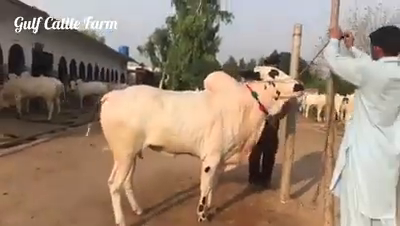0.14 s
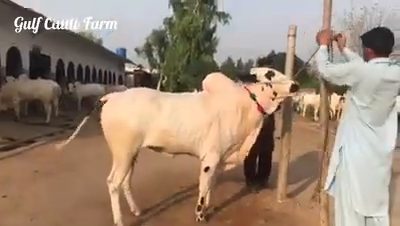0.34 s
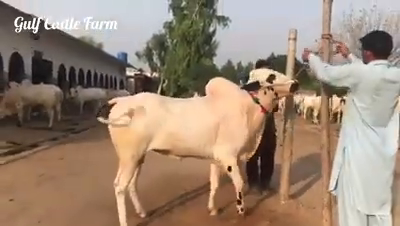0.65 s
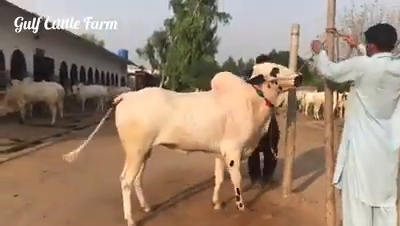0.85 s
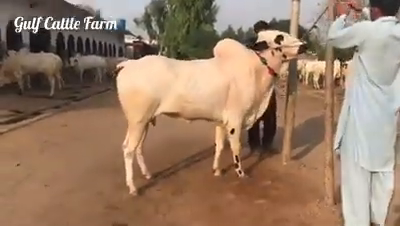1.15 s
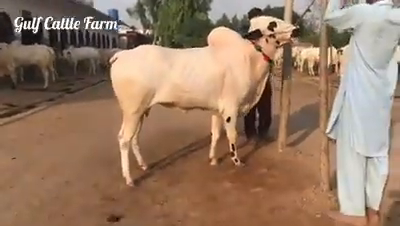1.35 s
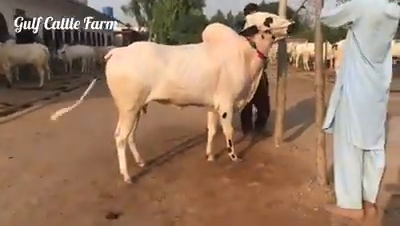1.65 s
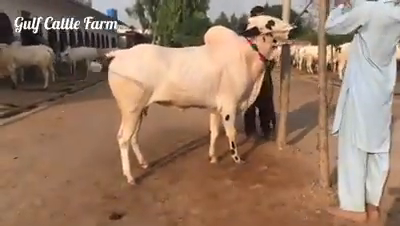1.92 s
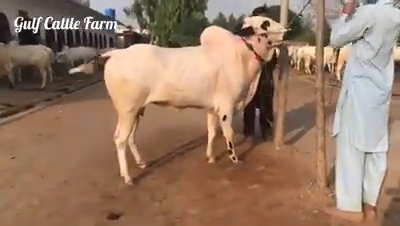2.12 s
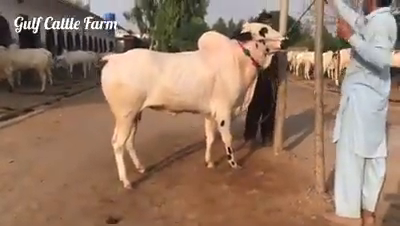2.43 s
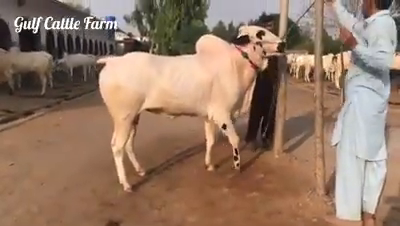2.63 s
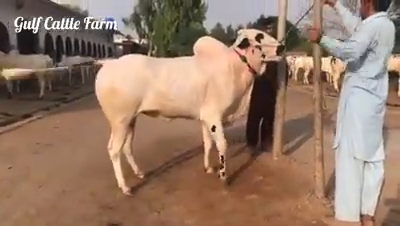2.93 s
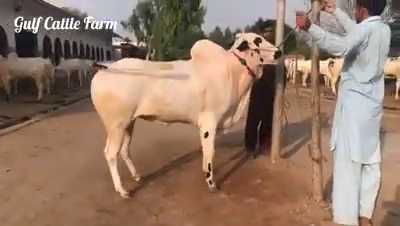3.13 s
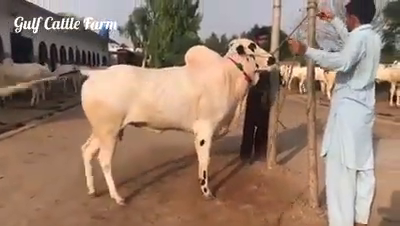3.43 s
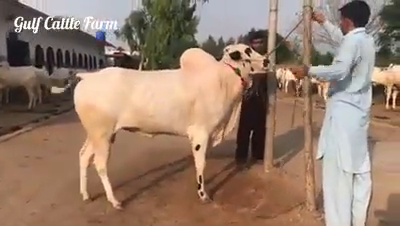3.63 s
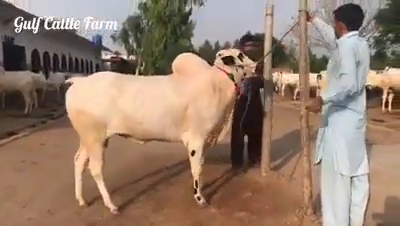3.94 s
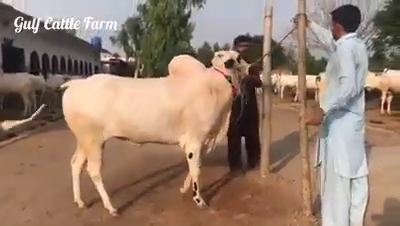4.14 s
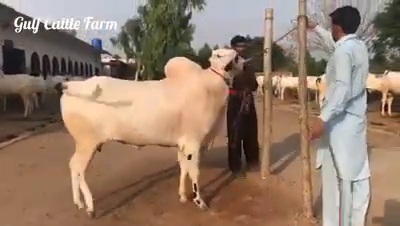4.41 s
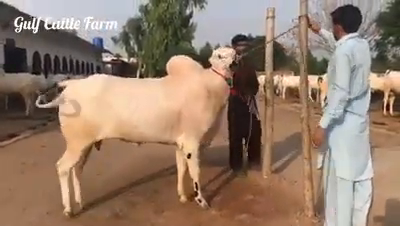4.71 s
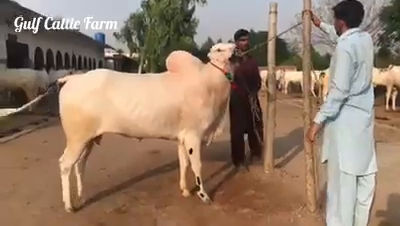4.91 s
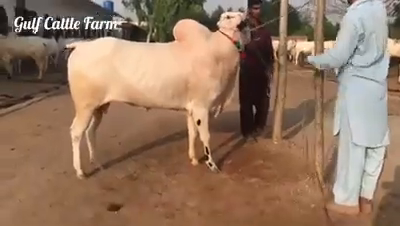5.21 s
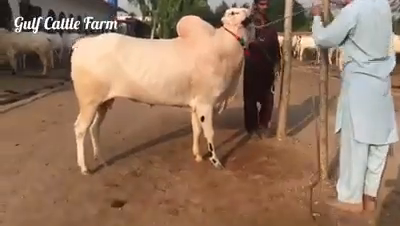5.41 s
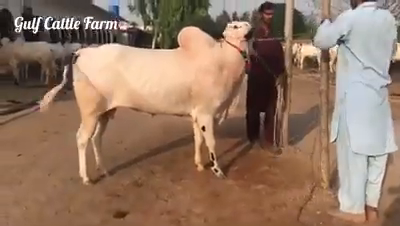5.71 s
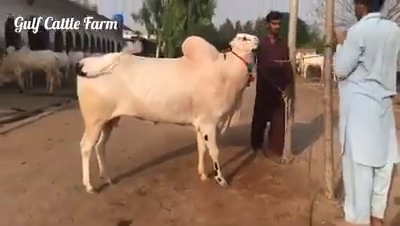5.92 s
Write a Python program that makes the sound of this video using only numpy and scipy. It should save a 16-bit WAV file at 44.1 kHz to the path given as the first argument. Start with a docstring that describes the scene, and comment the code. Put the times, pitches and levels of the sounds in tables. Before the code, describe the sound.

Uneven clinks of a small rattling bell come first, dry and bright, with gritty hoof movement. Then one loud, nasal, open-mouthed bull's call dominates for a second and a half, its pitch falling into a coarse rumble. Sparse clinks, a tick and scuffs finish it. Open air, faint bird chirps and a low distant engine lie behind; the animal is near the microphone.

```python
"""A farmyard: small metal bells on a tethered bull clink as it shifts, with tether ticks and hoof scuffs.
After about two seconds it gives one long moo that rises, falls and breaks up into a growl; clinks follow.
The bells are decaying sine modes plus noise; the voice is overtones and noise shaped by throat, nose and mouth.
Behind it all a slow engine thuds far off (wavering bass sines over rumbling noise) and the open air rushes
and hisses (filtered noise); now and then a bird chirps faintly and low notes sound (gliding sines)."""
import sys
import numpy as np
from scipy import signal
from scipy.fft import rfft, irfft, next_fast_len
from scipy.io import wavfile
from scipy.ndimage import uniform_filter1d, map_coordinates

SR = 44100
rng = np.random.default_rng(int(sys.argv[2]) if len(sys.argv) > 2 else 0)


def store_pcm(level_fs):
    """Save levels as 16-bit WAV."""
    pcm = np.round(np.clip(level_fs, -1, 1) * 32767).astype(np.int16)
    wavfile.write(sys.argv[1], SR, np.atleast_2d(pcm).T)


N = 267246

# loudness of the nasal hum, whose start is also the onset of the voice: t/s, level/dB
EFFORT = [(2.44, -54), (2.49, -23.5), (2.56, -16), (2.704, -27), (2.76, -23), (2.85, -30.5), (3.044, -17.5),
          (3.136, -22), (3.35, -17), (3.462, -22.5), (3.492, -20), (3.558, -30), (3.71, -36), (3.76, -36),
          (3.82, -36.5), (3.885, -30.5), (3.94, -45)]


def moo():
    """The vocal folds drive the chest, the nose and the open mouth; slack folds make the voice rough."""
    pitch, slack = folds()
    clean, added_slack, added_onset, settle_s = 0.223, 0.43, 0.382, 0.09  # roughness 0-1 and its settling time
    age = np.maximum(np.arange(N) / SR - EFFORT[0][0], 0)
    onset = np.exp(-(age / settle_s) ** 2)
    rough = np.clip(clean + added_slack * slack + added_onset * onset, 0, 1)
    unsteady_pitch = pitch * (1 + 0.01818 * rough * wobble(70))
    phase = 2 * np.pi * np.cumsum(unsteady_pitch) / SR
    return chest_tone(phase) + nasal_hum(pitch, phase, rough) + open_mouth(pitch, phase, rough, slack)


def folds():
    """Pitch of the vocal folds, and their slackness 0-1, which grows as the pitch sinks."""
    # the moo, sinking unsteadily as it runs out: t/s, pitch/Hz
    pitch_curve = [(2.47, 124), (2.515, 122.1), (2.565, 133), (2.622, 134.2), (2.664, 133.8),
                   (2.766, 138.3), (2.89, 141.6), (2.982, 138.7), (3.084, 132.1), (3.15, 125.3),
                   (3.216, 123.7), (3.40, 122.8), (3.506, 116.6), (3.564, 108.4), (3.62, 104.9),
                   (3.68, 99.17), (3.73, 86.14), (3.78, 91.9), (3.87, 81.2), (3.91, 81), (3.97, 62.14)]
    taut_hz, slack_span_hz = 129.36, 28.3  # slackening starts below this pitch, complete this much lower
    pitch, = curves(pitch_curve)
    return pitch, np.clip((taut_hz - pitch) / slack_span_hz, 0, 1)


def chest_tone(phase):
    """The fundamental of the voice, sounding through the chest."""
    # strength of the fundamental before a small trim: t/s, level/dB
    chest = [(2.47, -38.5), (2.646, -43), (2.962, -34), (3.254, -42.5), (3.286, -35), (3.62, -44)]
    trim_db = -0.5
    level_db, = curves(chest)
    return amp(level_db + trim_db) * np.sqrt(2) * np.cos(phase) * during(chest, fade=0.016)


def nasal_hum(pitch, phase, rough):
    """Overtones 2 to 4 hum through the nose; roughness makes their level shake."""
    effort_db, = curves(EFFORT)
    gains = np.array([nose(k * pitch) * amp(1.5 * wobble(12)) for k in range(2, 5)])
    gains = gains / np.linalg.norm(gains, axis=0)  # the nose sets only the balance of the overtones
    hum = np.zeros(N)
    for k, gain in enumerate(gains, 2):
        hum += gain * np.sqrt(2) * np.cos(k * phase + 2 * np.pi * rng.random())
    return hum * amp(effort_db + 2.5 * rough * wobble(70)) * during(EFFORT, fade=.025)


def nose(hz):
    """Gain of the nasal passage at a moving frequency: resonances change as it opens, notches stay."""
    # resonances of the nose: f/Hz, width/Hz, level closed/dB, level open/dB
    resonances = [(261.5, 24, 13, 4.5), (371, 40.4, -40, 0), (536, 48, -9.5, -15.5)]
    # frequencies that the nose swallows: f/Hz, width/Hz
    notches = [(287, 18.7), (455, 19)]
    opens_s, opening_s = 2.46, 0.42  # when it starts to open and how long that takes
    opening = np.clip((np.arange(N) / SR - opens_s) / opening_s, 0, 1)
    gain = np.zeros(N)
    for centre, width, closed, opened in resonances:
        level = amp(closed + (opened - closed) * opening)
        gain += level / (1 + (2 * (hz - centre) / width) ** 2) ** 0.86
    for centre, width in notches:
        gain *= 1 - 0.88 / (1 + ((hz - centre) / width) ** 2)
    return gain


def open_mouth(pitch, phase, rough, slack):
    """Overtones swell in moving mouth resonances as vowel and rasp; roughness mixes in turbulence."""
    # loudness of the vowel before a fixed boost and the unevenness of slack folds: t/s, level/dB
    mouth_levels = [(2.35, -52), (2.454, -54.5), (2.478, -39.5), (2.598, -30.5), (2.702, -32), (2.79, -41),
                    (2.984, -43.5), (3.076, -31.5), (3.102, -39.5), (3.378, -41), (3.456, -34.5),
                    (3.62, -39), (3.672, -44.5), (3.71, -36), (3.8, -47), (3.87, -46.5), (3.96, -57),
                    (4.1, -60)]
    # loudness of the rasp above the vowel: t/s, level/dB
    rasp_levels = [(2.45, -56.5), (2.51, -37.5), (2.6, -42.5), (2.72, -45), (2.8, -44), (2.93, -42),
                   (2.96, -40.5), (3.02, -41.5), (3.15, -41), (3.21, -41.5), (3.42, -44), (3.52, -51.5),
                   (3.68, -56.5), (3.86, -55.5), (4.0, -70)]
    # colour of the throat: f/Hz, level/dB
    throat = [(550, -5), (620, -3), (685, -6), (800, 3), (930, 1), (990, -5), (1075, 1), (1240, -4),
              (1370, -15.5), (1580, -7), (1750, -13), (1970, -7), (2450, -11), (2850, -23), (3350, -14),
              (4100, -16), (4800, -37.5)]
    # three mouth resonances that follow the jaw: t/s, lower f/Hz, middle f/Hz, upper f/Hz
    jaw = [(2.49, 606, 780, 1900), (2.59, 788, 973, 1742), (2.72, 810, 970, 1780), (2.81, 808, 1150, 1870),
           (2.9, 655, 1150, 2060), (2.99, 682, 1180, 1910), (3.06, 973, 1080, 1860),
           (3.17, 760, 1213, 1800), (3.33, 782.6, 1240, 2137), (3.46, 839.4, 1046, 2324),
           (3.6, 933, 1020, 2400), (3.86, 810, 1010, 1570)]
    width_hz, middle_db = 48, 1.5  # half width of the lower two; the middle one against the lowest
    break_db = 3.5  # how unevenly the mouth sounds once the folds are slack
    lower_hz, middle_hz, upper_hz = curves(jaw)

    def overtone(k):
        """Reflections make each gliding overtone flutter in level and phase."""
        flutter_db = (2 if k < 11 else 3.5) * wobble(14)
        gain = amp(along(throat, k * pitch) + flutter_db)
        return gain * np.cos(k * phase + 2 * np.pi * rng.random() + 0.4 * wobble(21))

    def peak(hz, centre, width):
        """Gain of one mouth resonance."""
        return 1 / np.hypot(1, (hz - centre) / width)

    def lower(hz):
        """Gain of the two resonances that make the vowel."""
        return peak(hz, lower_hz, width_hz) + amp(middle_db) * peak(hz, middle_hz, width_hz)

    def blend(tone, noise, share):
        """Mix tone and noise, with the noise taking this share of the power."""
        return np.sqrt(1 - share) * steady(tone) + np.sqrt(share) * steady(noise)

    vowel = sum(lower(k * pitch) * overtone(k) for k in range(5, 14))
    buzz = sum((0.11 + peak(k * pitch, upper_hz, 220)) * overtone(k) for k in range(11, 42))
    # turbulence puffs once in every cycle
    puffs = coloured(rng.standard_normal(N) * (1 + .5 * np.cos(phase)), throat)
    mouth_db = curves(mouth_levels)[0] + 2.65 + break_db * slack * (wobble(40) - 1.5)
    mouth = amp(mouth_db) * blend(vowel, band(puffs, 543, 1067), rough ** 2)
    rasp = amp(curves(rasp_levels)[0]) * blend(buzz, band(puffs, 1400, 3020, order=2), rough ** 2)
    voiced = during(mouth_levels, fade=.03)
    return smeared(mouth * voiced, wet_db=-13) + smeared(rasp * voiced, wet_db=-9)


def growl():
    """Slack folds flap unevenly; each flap knocks a throat resonance that wanders and mostly sinks, then rises."""
    # slack folds before and after the tone: t/s, level/dB, throat resonance f/Hz
    growl_curve = [(2.26, -81, 265), (2.37, -40, 267), (2.45, -47.5, 261), (2.55, -71, 261),
                   (3.35, -61.5, 278), (3.57, -39, 290), (3.61, -30.5, 315), (3.72, -30, 278),
                   (3.742, -29, 260), (3.78, -31, 350), (3.84, -35.5, 254), (3.888, -36, 251),
                   (3.92, -40, 240), (3.98, -44.5, 193), (4.06, -52, 355), (4.2, -54.5, 338),
                   (4.4, -84, 336)]
    # colour of the rest of the slack throat: f/Hz, level/dB
    slack_throat = [(120, -11), (190, -15.5), (250, 7), (310, -3.5), (375, -2), (460, -12), (620, -10.5),
                    (800, -41)]
    jitter = .045  # unevenness of the flaps, as share of a cycle
    knock_t60_s, body_db = 0.05, -3.5  # decay of one knock; the rest of the throat against it
    growl_db, throat_hz = curves(growl_curve)
    flaps = pulses(folds()[0], np.full(N, jitter), scatter_db=2.0)
    knocks, age = np.zeros(N), np.arange(SR // 20) / SR
    for i in np.flatnonzero(flaps):
        knock = amp(-60 * age / knock_t60_s) * np.sin(2 * np.pi * throat_hz[i] * age)
        add(knocks, i / SR, flaps[i] * knock)
    body = amp(body_db) * unit(coloured(flaps, slack_throat))
    return amp(growl_db) * steady(smeared(band(unit(knocks) + body, 120, 840), wet_db=-10))


def smeared(x, wet_db):
    """Near walls blur a gliding voice and make it beat against itself, at about the same loudness."""
    # near walls: f/Hz, time to die by 60 dB/s
    walls = [(200, 0.77), (1000, 0.38), (4000, 0.093)]
    return (x + amp(wet_db) * yard(x, walls)) / np.hypot(1, amp(wet_db))


def bells():
    """All the bell sounds: struck main bell, lighter bells and rolling pellets."""
    # colour of a pellet chattering or rolling in its shell: f/Hz, level/dB
    sizzle = [(2500, -26.5), (4500, -15), (5500, -21.5), (6500, -1), (7400, -10.5), (8700, 0), (9600, -10),
              (10800, -11), (11800, 4), (12500, -2), (13500, -7.5), (14300, -1.5), (15000, -8)]
    return main_bell(sizzle) + light_bells() + rolling_pellets(sizzle)


def main_bell(chatter):
    """A pellet hits the shell and rattles; the spot it hits decides which modes ring, the hide damps them."""
    # bell strikes: t/s, reference level/dB, then strengths before the bell's own balance: lowest mode/dB,
    # second mode/dB, middle pair/dB, upper pair/dB; strengths before filtering: clank/dB, sizzle/dB;
    # spot on the shell/0-1, longest time to die by 60 dB/s
    clinks = [(0.0804, -29.5, -44, -48.5, -55, -38.5, -31, -45.5, 0, 0.43),
              (0.1998, -30, -40.5, -43, -43.5, -49, -36, -40, 0.4, 0.87),
              (0.850, -23, -36, -55, -36.5, -40, -26, -43, 0.73, 0.76),
              (0.8714, -28.5, -72, -65, -37.5, -48, -46, -52, 0.92, 0.45),
              (1.0345, -38, -52.5, -65, -60, -67, -52, -55, .5, .7),
              (1.1029, -45, -63, -66, -57, -61, -46, -49, .43, .5),
              (1.293, -28.5, -43, -43.5, -45.5, -54, -54, -40.5, 0, .55),
              (1.4187, -28.5, -42.5, -42, -38.5, -51, -39, -40.5, 0.3, 0.72),
              (1.5635, -28, -43, -41, -43, -38.5, -23, -39, 0, 0.5),
              (1.6915, -28, -45, -47, -44, -51, -24.5, -45.5, .5, 0.45),
              (1.8468, -39.5, -55, -58, -65, -56, -60, -48.5, 0.1, 0.79),
              (2.005, -26.5, -47, -55, -39, -46, -58, -41.5, 0.84, 0.97),
              (2.1595, -32.5, -48, -47, -51.5, -52.5, -41, -53, .03, .85),
              (2.3136, -29, -45, -53, -44.5, -51, -45, -40, .85, 0.95),
              (2.788, -43, -53, -66, -54, -58, -40.5, -49, 0.04, .4),
              (4.3774, -58, -55.5, -67, -62, -77, -58, -64, 0, 0.64),
              (4.6698, -33, -45.5, -61, -54, -55, -39, -42, 0.3, 0.34),
              (4.7516, -34.5, -42, -70, -43, -57, -55, -50, 0.72, 0.34),
              (4.9373, -22, -38.5, -53, -35.5, -55, -34, -34, 0.5, 0.45)]
    # modes of the main bell: f/Hz, level struck at spot 0/dB, level struck at spot 1/dB, t60/s
    bell = [(2031, -3.5, -3.5, .85), (4996, 0, 0, .38), (6166, -15, -17, .5), (6374, 0, 0, .32),
            (8096, 0, 0, .2), (8922, -4, -2, .2), (10164, -17, 7, .2), (10853, 1, 1, .2),
            (11690, -11, -13, .14), (12368, -4, -6, .2), (12920, -2, -15, .24), (14298, 6.5, -9, .2)]
    # upper edges of the lowest, second, middle and upper groups of modes: f/Hz
    group_edges = [3000, 5600, 7200, 9500]
    # clusters of short shell modes: f/Hz
    shell_hz = [5530, 7230, 8930, 12500, 10900, 11100]
    top_modes_db = -15.5  # modes above the groups, against the reference level
    shell_spread, shell_db, shell_t60_s = 0.04, -31, 0.046  # relative width, level against reference, decay
    return_s, return_db = .028, -13  # the pellet falls back about this much later, and softer
    out = np.zeros(N)
    mode_hz, near_db, far_db, decay = np.transpose(bell)
    group = np.searchsorted(group_edges, mode_hz)
    scatter_db = np.where(mode_hz < 7200, 1, 2.5)[:, None]  # high modes vary more from blow to blow
    for s, db, low_db, second_db, pair_db, upper_db, clank_db, sizzle_db, spot, longest in clinks:
        strike_db = np.array([low_db, second_db, pair_db, upper_db, db + top_modes_db])[group]
        mode_db = strike_db + near_db + (far_db - near_db) * spot
        modes = np.transpose([mode_hz, mode_db, np.minimum(decay, longest)])
        add(out, s, ring(modes, scatter_db).sum(0))
        return_at = s + return_s * rng.uniform(.7, 1.3)
        add(out, return_at, amp(return_db) * ring(modes, scatter_db=3).sum(0))
        add(out, s, amp(db - 13) * band(burst(t60=0.039), 890, 17000, order=2))  # click of the blow
        add(out, s, amp(sizzle_db) * coloured(burst(t60=0.19), chatter))
        # the pellet rebounds and wakes short, dense shell modes
        for bounce, (late, *detune) in enumerate(rng.uniform(-1, 1, (4, 1 + len(shell_hz)))):
            shell = [(hz * (1 + shell_spread * u), -2 * bounce, shell_t60_s) for hz, u in zip(shell_hz, detune)]
            bounce_at = s + bounce * (.009 + .002 * late)
            add(out, bounce_at, amp(db + shell_db) * ring(shell, scatter_db=4).sum(0))
        add(out, s + 0.0024, amp(clank_db) * band(burst(t60=0.045), 5200, 6200, order=2))
    return out


def light_bells():
    """Smaller bells ring with one shared set of modes, shifted in pitch."""
    # strikes of lighter bells: t/s, level/dB, pitch ratio
    tinkles = [(0.876, -55, 1.345), (2.225, -53, 1), (2.787, -51.5, 1.345), (4.053, -51.5, 1.101),
               (4.378, -60, 1.101)]
    # modes of a small bell at pitch ratio 1: f/Hz, level/dB, t60/s
    small_bell = [(3989, -1.5, 0.86), (7407, -4, 0.3), (8786, -4, 0.24), (9800, -8, .25), (11886, 1.5, 0.2)]
    out = np.zeros(N)
    for s, db, ratio in tinkles:
        modes = [(hz * ratio, level, t60) for hz, level, t60 in small_bell]
        add(out, s, amp(db) * ring(modes, scatter_db=2).sum(0))
    return out


def rolling_pellets(chatter):
    """Pellets rolling round in the shells make short swells of coloured noise."""
    # rolls: t/s, level before the swell/dB, length/s
    rattles = [(1.053, -60, 0.14), (1.839, -51.5, 0.11), (2.191, -57.5, .12), (3.64, -69, 0.06),
               (4.033, -57, 0.12), (4.095, -66, 0.2), (4.492, -58.5, .12), (4.635, -58.5, 0.087),
               (5.219, -60.5, .25), (5.856, -63, 0.2)]
    out = np.zeros(N)
    for s, db, length in rattles:
        roll = unit(coloured(rng.standard_normal(SR // 2), chatter))[:int(length * SR)]
        add(out, s, amp(db) * roll * np.hanning(len(roll)) ** .5)
    return out


def shuffling():
    """The tether ticks as sharp bursts of noise; hooves scuff the dirt as soft, gritty ones."""
    # dry ticks of the tether, before fixed trims: t/s, treble level/dB, low part level/dB
    ticks = [(0.183, -37.5, -50), (1.077, -41.5, -45), (1.278, -30, -46), (1.887, -34, -64),
             (2.788, -33, -51), (3.223, -20.5, -47), (3.827, -24.5, -21.5), (3.85, -49.5, -43),
             (5.443, -31, -48)]
    # hooves on dirt: t/s, level before a fixed boost/dB, time to die by 60 dB/s
    scuffs = [(0.455, -51, 0.24), (0.726, -44, 0.07), (5.292, -57, 0.68), (5.519, -46, 0.34),
              (5.62, -50, 0.26)]
    # colour of a scuff: f/Hz, level/dB
    dirt = [(200, -55), (600, -4.5), (1200, -1), (2000, -13), (6000, -21), (14000, -24.5)]
    grain_db = 3.5  # grit makes a scuff uneven
    out = np.zeros(N)
    for s, db, low_db in ticks:
        snap = burst(t60=0.036) + amp(-20) * burst(t60=.08)
        treble = amp(db - 2.0) * band(snap, 1900, 3400, order=1)
        low = amp(low_db + 5.5) * band(snap, 600, 1000, order=2)
        add(out, s, treble + low)
    for s, db, t60 in scuffs:
        grit_db = grain_db * wobble(90)[:SR // 2]
        add(out, s, amp(db + 13.0 + grit_db) * coloured(burst(t60), dirt))
    return out


def far_calls():
    """A bird's short chirps, all round one pitch, and a few low notes from across the farm."""
    # a small bird: t/s, length/s, level/dB, glide/Hz
    chirps = [(0.296, 0.12, -55.5, -220), (0.507, 0.12, -58, -260), (0.801, 0.037, -51, 228),
              (2.836, 0.067, -46, 129), (5.874, .046, -58, -170)]
    # faint notes: t/s, length/s, f/Hz, glide/Hz, level/dB
    far_notes = [(0.12, 0.37, 210, -9, -48.5), (5.128, 0.12, 690, 25, -57), (5.942, 0.12, 670, -17, -56)]
    chirp_hz, flutter = 3240, .015  # pitch of the bird; relative unsteadiness of all the notes
    out = np.zeros(N)
    for s, length, db, glide in chirps:
        add(out, s, amp(db) * note(length, chirp_hz, glide, flutter))
    for s, length, hz, glide, db in far_notes:
        add(out, s, amp(db) * note(length, hz, glide, flutter))
    return out


def note(length, hz, glide, flutter):
    """A softly swelling, slightly unsteady glide round a centre pitch."""
    size = int(length * SR)
    sweep = hz * (1 + flutter * wobble(200)[:size]) + glide * np.linspace(-.5, .5, size)
    return np.hanning(size) * np.sin(2 * np.pi * np.cumsum(sweep) / SR)


def engine():
    """A slow exhaust, smeared by distance into wavering bass lines over a rumble."""
    # the far engine's lines, before a fixed 1 dB boost: f/Hz, level/dB
    exhaust = [(46.2, -60.5), (69.4, -55.5), (80.9, -58.5), (92.5, -52), (138.8, -67.5)]
    # colour of the rumble: f/Hz, level/dB
    rumble_colour = [(20, -27.5), (38, -14.5), (60, -3.5), (85, 0), (110, -10), (150, -14.5), (250, -36.5),
                     (400, -67)]
    drift = np.cumsum(1 + 0.0034 * wobble(2.4)) / SR  # seconds, running slightly unevenly
    lines = np.zeros(N)
    for hz, db in exhaust:
        lines += amp(db + 1.1 * wobble(0.71)) * np.sin(2 * np.pi * (hz * drift + rng.random()))
    rumble = unit(coloured(rng.standard_normal(N), rumble_colour))
    return amp(1.0) * lines + amp(-52.0) * rumble


def air():
    """Open-air rush and a thin hiss, both filtered noise with a drifting level."""
    # colour of the air: f/Hz, level/dB
    air_colour = [(130, 6), (210, 1.5), (350, -2), (550, -7.5), (1000, -8), (2000, -12.5), (3200, -10.5),
                  (4600, -22), (6700, -13.5), (8200, -23), (10000, -27), (13000, -23), (15000, -31)]
    # loudness of the treble hiss: t/s, level/dB
    hiss_levels = [(0.0, -60.5), (1.7, -66), (2.5, -61), (3.2, -64), (3.7, -62), (4.9, -64), (5.3, -62),
                   (6.05, -61)]
    hiss_db, = curves(hiss_levels)
    rush = unit(band(coloured(rng.standard_normal(N), air_colour), 100, 2510))
    hiss = unit(band(coloured(rng.standard_normal(N), air_colour), 3290, 15000))
    return amp(-55.3 + 1.2 * wobble(13)) * rush + amp(hiss_db + 1.2 * wobble(14)) * hiss


def yard(x, decays):
    """An echo of dying noise, 600 samples late: each frequency dies at its own speed."""
    hz, t, z = signal.stft(rng.standard_normal(SR // 2), SR, nperseg=256)
    dying = z * amp(-60 * t / along(decays, hz)[:, None])
    tail = signal.istft(dying, SR, nperseg=256)[1]
    return signal.fftconvolve(np.pad(x, (600, 0)), tail / np.linalg.norm(tail))[:N]


def amp(db):
    """Decibels to gain."""
    return 10 ** (np.asarray(db) / 20)


def unit(x):
    """Scale to rms 1."""
    return x / np.sqrt(np.mean(x ** 2) + 1e-20)


def steady(x):
    """Scale to a running rms of 1."""
    return x / np.sqrt(np.abs(uniform_filter1d(x ** 2, size=1800)) + 1e-12)


def along(points, hz):
    """(Hz, value) points read on a log axis."""
    f, v = np.transpose(points)
    return np.interp(np.log(hz + 1), np.log(f + 1), v)


def curves(rows):
    """One value per sample for each column after the time."""
    s, *cols = np.transpose(rows)
    return [np.interp(np.arange(N) / SR, s, c) for c in cols]


def during(rows, fade):
    """1 within a table's time span, fading to 0 at both ends."""
    t = np.arange(N) / SR
    return np.clip(np.minimum(t - rows[0][0], rows[-1][0] - t) / fade, 0, 1)


def wobble(rate):
    """A smooth random curve, rate knots a second."""
    knots = rng.standard_normal(int(N * rate / SR) + 4)
    return map_coordinates(knots, [np.arange(N) * rate / SR])


def coloured(x, points):
    """Filter with the gain of (Hz, dB) points, without ringing ahead of the sound."""
    m = 2 * next_fast_len(len(x) // 2 + 8192)
    cepstrum = irfft(np.log(amp(along(points, np.fft.rfftfreq(m, 1 / SR)))))
    # folding the cepstrum forward makes the filter minimum-phase
    cepstrum[1:m // 2] *= 2
    cepstrum[m // 2 + 1:] = 0
    return irfft(rfft(x, m) * np.exp(rfft(cepstrum)), m)[:len(x)]


def band(x, lo_hz, hi_hz, order=4):
    """Keep the frequencies between two edges."""
    edges = [lo_hz, min(hi_hz, SR / 2 - 1)]
    return signal.sosfilt(signal.butter(order, edges, 'band', fs=SR, output='sos'), x)


def pulses(rate, jitter, scatter_db):
    """Impulses at a moving rate, uneven in time (share of a cycle) and size."""
    at = np.flatnonzero(np.diff(np.floor(np.cumsum(rate) / SR)))
    chance = rng.standard_normal((len(at), 2))
    at = np.clip(at + jitter[at] * chance[:, 0] * SR / rate[at], 0, N - 1).astype(int)
    return np.bincount(at, amp(scatter_db * chance[:, 1]), N)


def add(track, s, sound):
    """Mix a sound in at time s."""
    part = track[max(round(s * SR), 0):][:len(sound)]
    part += sound[:len(part)]


def burst(t60):
    """Half a second of noise that dies by 60 dB in t60 seconds."""
    t = np.arange(SR // 2) / SR
    return rng.standard_normal(len(t)) * amp(-60 * t / t60)


def ring(modes, scatter_db):
    """One row per mode of struck metal, a dying sine at a new strength for every blow."""
    t = np.arange(SR) / SR
    hz, db, t60 = np.transpose(modes)[:, :, None]
    phase = 2 * np.pi * (hz * t + rng.random(hz.shape))
    strength = amp(db + scatter_db * rng.standard_normal(hz.shape) - 60 * t / t60)
    return strength * np.sin(phase) * (1 - np.exp(-t / .001))  # soft start of about 1 ms


def scene():
    """The bull and its trappings close by, the farm behind, and the sheds' echo."""
    # echo of the yard: f/Hz, time to die by 60 dB/s
    yard_decays = [(200, 1), (2000, 0.78), (10000, 0.036)]
    call = moo() + growl()
    small = bells() + shuffling() + far_calls()
    echo = yard(amp(-24) * call + amp(-19) * small, yard_decays)
    return (call + small + echo + engine() + air())[None]


def record(dry):
    """Nothing above the top frequency is kept."""
    top_hz = 15000
    m = next_fast_len(N + SR // 2)
    return irfft(rfft(dry, m) * (np.fft.rfftfreq(m, 1 / SR) < top_hz), m)[..., :N]


dry = scene()
out = record(dry)
store_pcm(out)
```